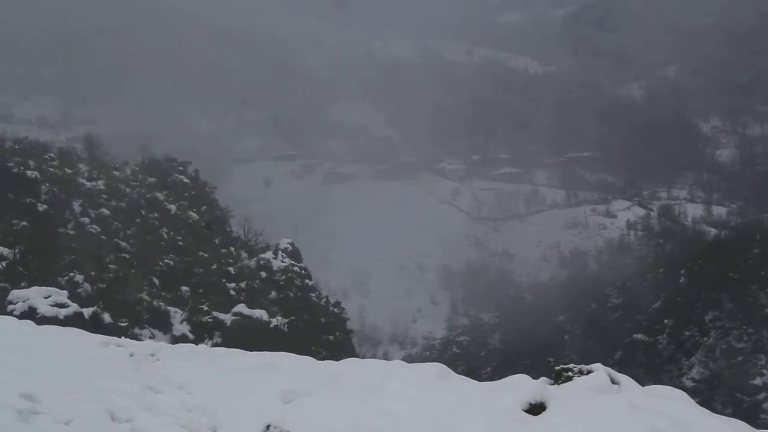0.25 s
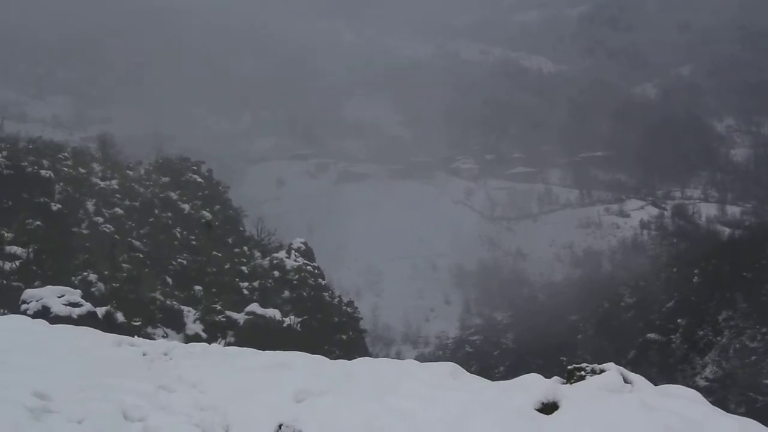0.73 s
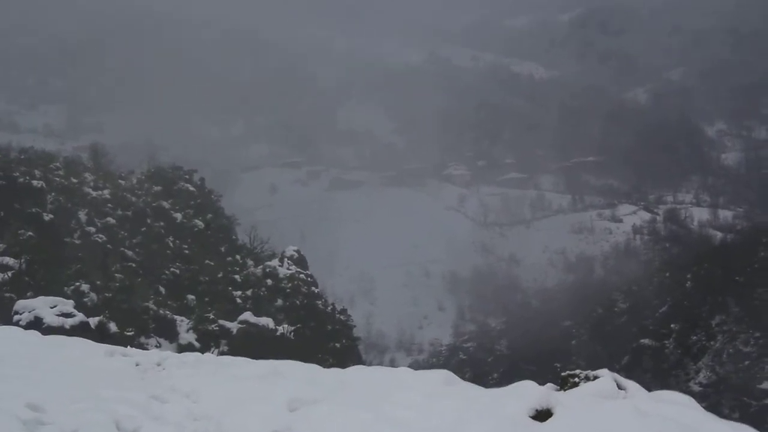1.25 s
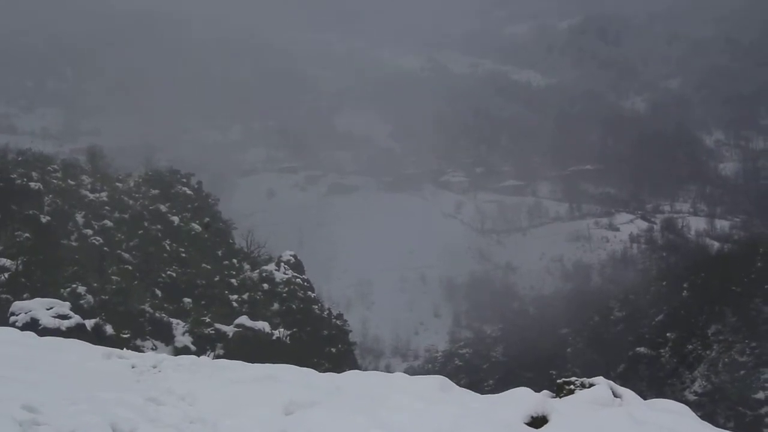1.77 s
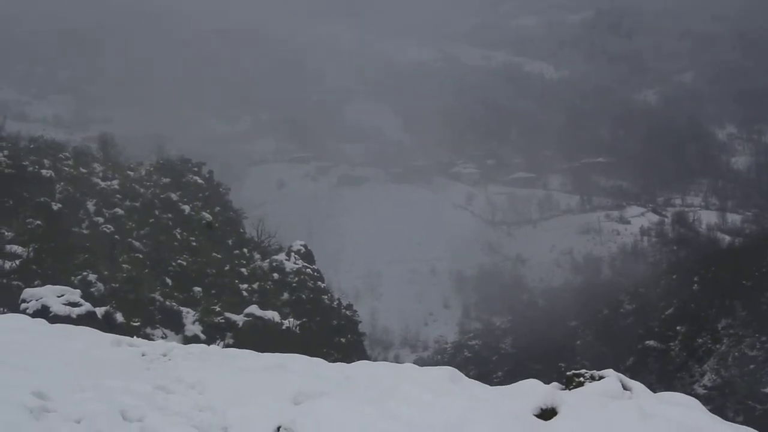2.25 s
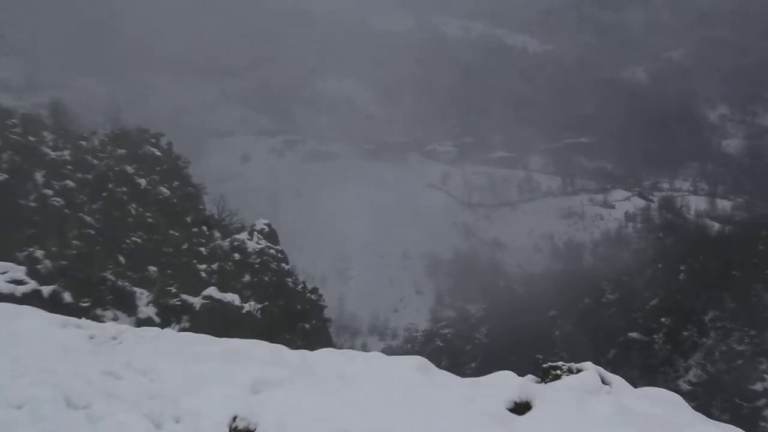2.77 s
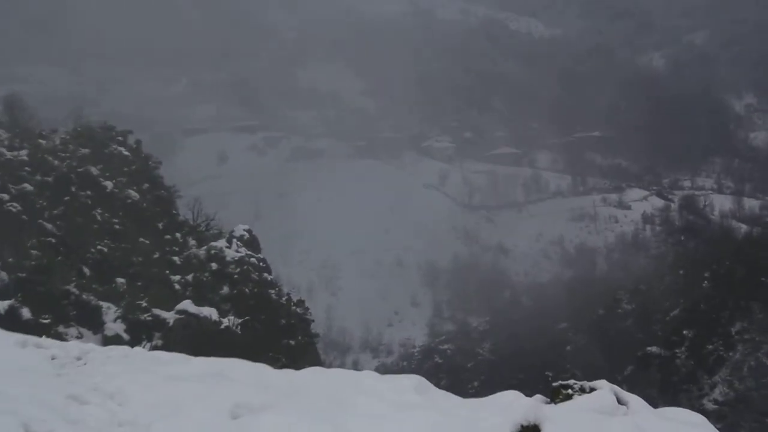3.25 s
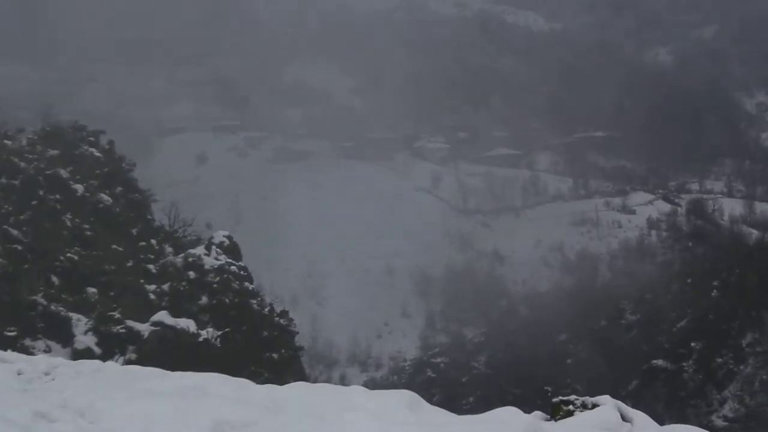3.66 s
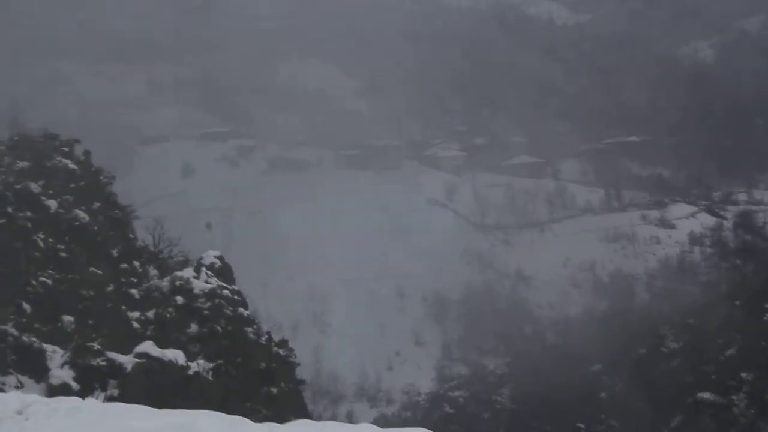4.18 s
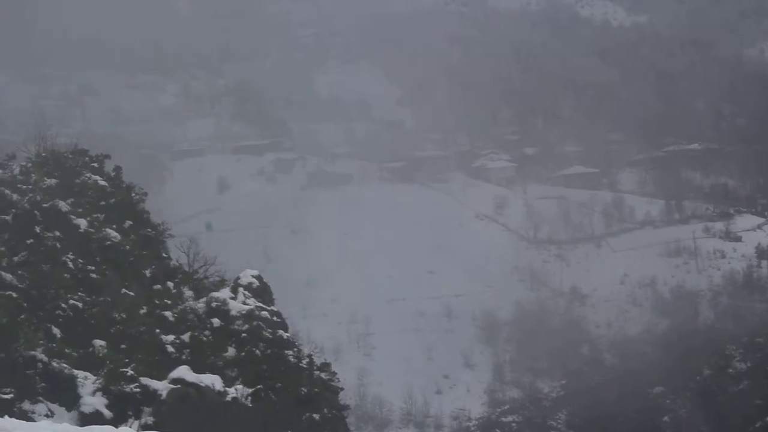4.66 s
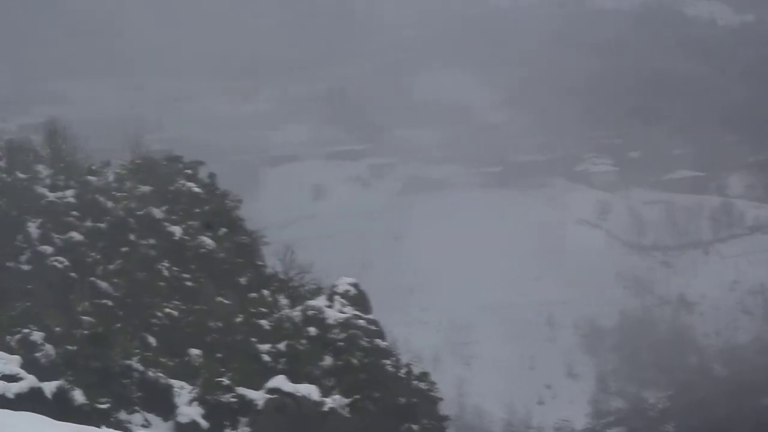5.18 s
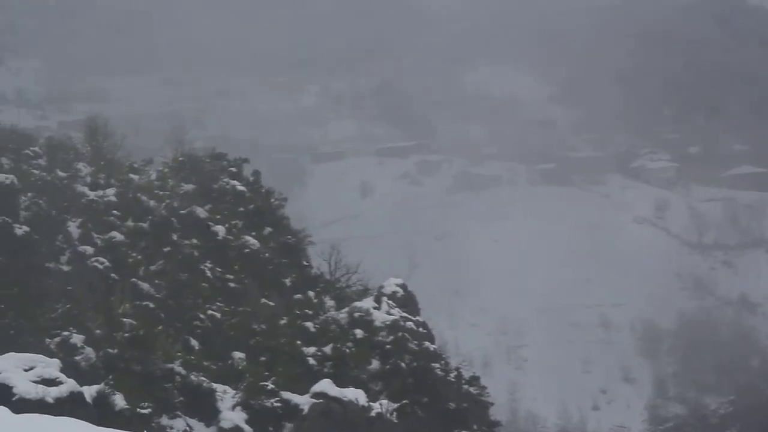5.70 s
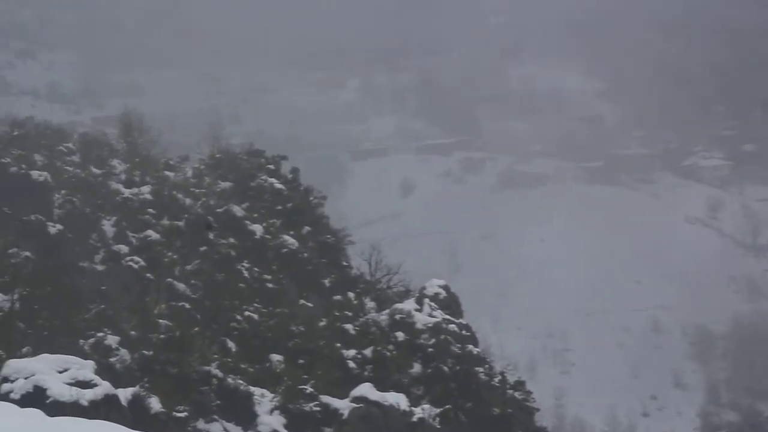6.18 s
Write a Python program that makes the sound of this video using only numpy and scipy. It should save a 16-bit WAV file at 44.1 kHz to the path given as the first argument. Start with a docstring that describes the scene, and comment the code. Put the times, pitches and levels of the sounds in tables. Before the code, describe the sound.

Snowstorm on a mountainside, heard very close at a small camera's microphone. After a brief quiet start, strong gusts rumble and ice pellets crackle and knock the housing in a dense, overloading flurry. The wind eases to scattered ticks, hits thicken near four seconds, then a short lull and irregular taps to the end.

```python
"""A snowstorm on a mountainside, heard by a small camera, over the faint steady roar of the valley (shaped noise).
Strong gusts soon buffet the microphone (lumpy low noise) and drive ice pellets against the housing: grains of noise
crackle and patter in flurries, and hard hits tick, knock and thump by exciting resonances. The wind then eases to
scattered hits; they thicken near four seconds, a thin sine whistle shows in the lull after, and more hits follow
to the end. The loudest blows reach the recorder's ceiling."""
import sys
import numpy as np
from scipy.fft import rfft, irfft, next_fast_len
from scipy.io import wavfile
from scipy.ndimage import map_coordinates

SR = 44100
rng = np.random.default_rng(int(sys.argv[2]) if len(sys.argv) > 2 else 0)


def put_to_file(sound):
    """Save the sound as 16-bit audio at rate SR, in the file named by the first command-line argument."""
    columns = np.atleast_2d(sound).T  # one column per channel
    safe = np.clip(columns, -1, 1)
    whole_steps = np.round(safe * 32767)
    wavfile.write(sys.argv[1], SR, whole_steps.astype(np.int16))


N = 283563
T = np.arange(N) / SR  # time, s


def amp(db):
    """Level to gain: 20 dB is a factor of ten in amplitude."""
    return 10 ** (np.asarray(db) / 20)


def unit(x):
    """Normalisation: the signal at a root mean square of 1."""
    return x / np.sqrt(np.mean(x ** 2) + 1e-20)


def wobble(rate):
    """Slow fluctuation: a smooth curve through random knots, rate of them a second."""
    knots = rng.standard_normal(int(N * rate / SR) + 4)
    return map_coordinates(knots, [T * rate])


def filtered(x, response):
    """Linear filtering: the spectrum times a response of frequency, padded against wrap-around."""
    size = next_fast_len(x.shape[-1] + 8192)
    spectrum = rfft(x, size) * response(np.fft.rfftfreq(size, 1 / SR))
    return irfft(spectrum, size)[..., :x.shape[-1]]


def coloured(x, spectrum):
    """Spectral shaping: x through (hz, db) points on a log frequency axis, at rms 1."""
    f, db = np.transpose(spectrum)

    def response(hz):
        return amp(np.interp(np.log(hz + 1), np.log(f), db, -120, -120))

    return unit(filtered(x, response))


def ring(f, hz, width):
    """Resonance: the response of a damped oscillator, 1 at its pitch hz, width in Hz."""
    return 1j * f * width / (hz ** 2 - f * f + 1j * f * width)


def laid(times, rows):
    """Superposition: each row added in at its time."""
    at = np.round(times * SR).astype(int)[:, None] + np.arange(rows.shape[1])
    return np.bincount(at.ravel(), rows.ravel(), N + SR)[:N]


def peaked(rows, db):
    """Peak normalisation: each row scaled to its peak level."""
    return rows / np.abs(rows).max(axis=1, keepdims=True) * amp(db)


def swollen(base_db, s, length, peak_db):
    """Power addition: bell-shaped swells are added to the power of a level in dB."""
    power = amp(2 * base_db)
    for at, wide, db in zip(s, length, peak_db):
        power = power + amp(2 * db) * np.exp(-(2.2 * (T - at) / wide) ** 2)
    return 10 * np.log10(power)


def damped(db, grows):
    """Level compression: the swing of a level curve about its mean is scaled."""
    return db.mean() + grows * (db - db.mean())


def grains(per_s, spread_db, lasts, hz, size):
    """Poisson process: swelling noise bursts at random times and pitches, many small, few large, power evened."""
    smallest_odds = 0.025  # bounds the largest grain
    draw = rng.random((6000, 3))
    expected = np.cumsum(per_s) / SR
    times = np.interp(np.cumsum(-np.log(draw[:, 0])), expected, T, right=-1)
    live = times >= 0  # the rest would fall after the end
    age = np.arange(size) / SR / lasts  # a burst's envelope is fullest at age 1
    bursts = rng.standard_normal((len(draw), size)) * age ** 2 * np.exp(-2 * age)
    pitch = hz * np.exp(2.44 * (draw[:, 2:] - 0.5))
    response = ring(np.fft.rfftfreq(size, 1 / SR), pitch, 0.7 * pitch) + 0.58
    bursts = irfft(rfft(bursts) * response)
    size_db = -spread_db * np.log(draw[:, 1:2] + smallest_odds)
    return unit(laid(times[live], peaked(bursts, size_db)[live]) / np.sqrt(per_s))


def valley():
    """Distant broadband noise: a shaped roar whose level barely wanders."""
    # Spectrum of the roar: hz, db (per Hz, relative)
    roar_spectrum = [(30, -42), (80, -5), (300, 0), (700, 6), (1500, 12), (3000, -14), (8000, -14),
                     (12000, -24), (16500, -34)]
    level_db = -56 + 0.9 * wobble(4.82)
    return amp(level_db) * coloured(rng.standard_normal(N), roar_spectrum)


def whistle():
    """Pure tone: a very faint sine of steady pitch in the lull, its level wavering."""
    start_s, end_s, fade_s, pitch_hz = 4.74, 5.1, 0.041, 10490
    on = np.clip(np.minimum(T - start_s, end_s - T) / fade_s, 0, 1)
    return on * amp(-73 + 4 * wobble(40)) * np.sin(2 * np.pi * pitch_hz * T)


def rumble(rumble_db):
    """Turbulent pressure: large eddies push on the microphone as deep noise."""
    # Spectrum of the large eddies: hz, db (per Hz, relative)
    rumble_spectrum = [(20, -48), (40, -7), (80, 8), (130, 5), (220, 6.5)]
    return amp(rumble_db + 2.8 * wobble(20)) * coloured(rng.standard_normal(N), rumble_spectrum)


def buffet(buffet_db):
    """Intermittent turbulence: small eddies push on the microphone in lumps."""
    # Spectrum of the small eddies: hz, db (per Hz, relative)
    buffet_spectrum = [(80, -48), (160, -2.5), (300, 0.5), (450, -5.5), (700, -11), (1300, -27.5)]
    lumps = amp(1.5 * wobble(25) + 3.2 * wobble(70))
    return amp(buffet_db) * unit(lumps * coloured(rng.standard_normal(N), buffet_spectrum))


def fine_snow():
    """Dense random impacts: grains too many to tell apart merge into fluctuating noise."""
    return amp(1.5 * wobble(60)) * rng.standard_normal(N)


def patter(per_s, patter_db, centre_hz):
    """Structure-borne sound: pellet taps pass through the housing, its thin parts taking the brighter share."""
    # Spectrum through the housing: hz, db (per Hz, relative)
    body_spectrum = [(300, -22), (500, -6), (750, -5), (1100, -10.5), (1700, -36.5), (3000, -92.5)]
    # Spectrum through its thin parts: hz, db (per Hz, relative)
    thin_spectrum = [(600, -82), (1100, -0.5), (1600, 6.5), (2400, -0.5), (3400, -4), (5000, -17.5),
                     (8000, -55)]
    taps = grains(0.7 * per_s, spread_db=2.0, lasts=0.002, hz=1240, size=600) + 0.61 * fine_snow()
    thin = np.clip(np.log(centre_hz / 680) / 1.5, 0.01, 0.95)  # power share of the thin parts
    body = np.sqrt(1 - thin) * coloured(taps, body_spectrum)
    return amp(patter_db) * (body + np.sqrt(thin) * coloured(taps, thin_spectrum))


def crackle(per_s, crackle_db):
    """Shot noise: brief bright ticks of many small pellets, blurring into hiss where they are dense."""
    # Spectrum of the crackle: hz, db (per Hz, relative)
    crackle_spectrum = [(1500, -5), (2500, 1.5), (4000, 0.5), (6000, 0), (8500, 0.5), (11000, -4.5),
                        (14000, -12.5), (16500, -22)]
    ticks = grains(per_s, spread_db=4.5, lasts=0.00055, hz=6300, size=300)
    return amp(crackle_db) * coloured(ticks + per_s / 900 * fine_snow(), crackle_spectrum)


def flurries(patter_db, centre_hz, crackle_db):
    """Impact density: a stronger flurry brings more pellets a second to both patter and crackle."""
    per_s = 420 * amp(0.25 * (crackle_db + 40) + 1.5 * wobble(30))
    per_s = np.clip(per_s, 30, 900)
    return patter(per_s, patter_db, centre_hz) + crackle(per_s, crackle_db)


def strays(buffet_db, patter_db, crackle_db):
    """Random impacts: rows of lesser hits, as strong as the weather of their moment."""
    count = 260
    tick_over_db, knock_over_db, thump_over_db = 18, 5, 6.5  # peaks over crackle, patter and buffet
    typical_hz = np.array([[6700], [990]])  # tick, knock
    draw = rng.standard_normal((count, 5))
    at = (rng.random(count) * (N - 1)).astype(int)
    scatter_db = 4.5 * np.clip(draw[:, :3], -3, 1.5).T
    tick_hz, knock_hz = typical_hz * np.exp(0.39 * draw[:, 3:].T)
    tick_db = crackle_db[at] + tick_over_db + scatter_db[0]
    knock_db = patter_db[at] + knock_over_db + scatter_db[1]
    thump_db = buffet_db[at] + thump_over_db + scatter_db[2]
    return np.transpose([T[at], tick_db, tick_hz, knock_db, knock_hz, thump_db])


def hits(rows):
    """Modal excitation: a hard pellet shatters with a coloured tick and shakes the modes of the housing."""
    # Modes of the housing before scatter: mode_hz, mode_db (relative), t60_s (time to fall 60 dB)
    housing_modes = [(170.5, -9, 0.059), (275, -11.5, 0.013), (403, -5.5, 0.013), (642, 3.5, 0.012),
                     (880, -1.5, 0.013), (1270, -5, 0.017), (1830, -1.5, 0.012), (2850, -1.5, 0.0034)]
    start_s, tick_db, tick_hz, knock_db, knock_hz, thump_db = np.transpose(rows)[..., None]
    count = len(start_s)
    t = np.arange(2048) / SR
    f = np.fft.rfftfreq(len(t), 1 / SR)

    def low(hz):
        return (hz / (hz + 1j * f)) ** 2

    noise = rng.standard_normal((count, 2, len(t)))
    lasting = np.exp(0.35 * rng.standard_normal((count, 1)))  # contact time varies from hit to hit

    age = t / (0.00051 * lasting)
    shatter = noise[:, 0] * (age ** 2 * np.exp(-2 * age) + 0.006 * amp(-60 * t / 0.019))  # burst and faint tail
    high = (1j * f / (1j * f + 2200)) ** 2  # the tick carries little bass
    tick = irfft(rfft(shatter) * ring(f, tick_hz, tick_hz) * high * low(16500))

    mode_hz, mode_db, t60_s = np.transpose(housing_modes)[:, None, :, None]
    draw = rng.standard_normal((count, len(housing_modes), 2))
    scattered_hz = mode_hz * np.exp(0.12 * draw[..., 1:])
    width_hz = np.log(1000) / np.pi / t60_s
    modes = amp(mode_db + 3.5 * draw[..., :1]) * ring(f, scattered_hz, width_hz)
    near = amp(-7 * np.log(mode_hz / knock_hz[:, None]) ** 2)  # modes far from the knock pitch are hardly stirred

    shove = rfft(noise[:, 1] * amp(-60 * t / (0.016 * lasting)))  # the crumbling contact lasts milliseconds
    knock = irfft(shove * (near * modes)[:, 3:].sum(axis=1) * low(1950))
    thump = irfft(shove * modes[:, :3].sum(axis=1) * low(580))  # the three lowest modes
    blows = peaked(tick, tick_db) + peaked(knock, knock_db) + peaked(thump, thump_db)
    return laid(start_s[:, 0], blows)


def scene():
    """Superposition: valley, wind, whistle, flurries and hits sum at one microphone."""
    # Weather between the swells: time_s, buffet_db, patter_db, patter_centre_hz, crackle_db
    gust_curve = [(0.0, -45, -45, 910, -57), (0.29, -44, -44.5, 920, -58), (0.36, -33.5, -31.5, 810, -42),
                  (0.52, -24.5, -27.5, 930, -33), (0.66, -15, -20, 860, -30), (0.75, -24.5, -29, 1000, -31),
                  (1.02, -24, -27, 840, -34), (1.14, -22, -23, 900, -31), (1.34, -30.5, -18.5, 1398, -30),
                  (1.42, -36.5, -40.5, 850, -47), (1.57, -31, -25, 865, -42), (1.65, -44.5, -55, 830, -59),
                  (1.8, -50.5, -56, 752, -69), (1.91, -52, -56, 797, -64), (1.96, -30, -39, 749, -42),
                  (2.12, -35, -43, 906, -39), (2.36, -41.5, -54, 1299, -42), (2.81, -38.5, -40, 941, -44),
                  (2.95, -39, -39, 850, -46), (3.02, -40, -44, 878, -55), (3.159, -38.5, -42, 899, -55),
                  (3.46, -33.5, -38, 780, -47), (3.64, -37, -42, 799.7, -50), (3.8, -25.5, -34, 716, -43),
                  (4.1, -29.5, -35.5, 841, -45), (4.27, -38.5, -42, 886, -53),
                  (4.45, -32.5, -39.5, 895.5, -45), (4.64, -41, -42.5, 893, -55),
                  (4.8, -46, -44, 896.4, -60), (5.05, -43, -39.5, 899, -59), (5.2, -31, -39, 870, -48),
                  (5.42, -36, -38, 851, -52), (5.58, -43.5, -42.5, 865, -60), (5.78, -34, -37, 900, -49),
                  (6.02, -43.5, -47, 952, -59), (6.279, -39.5, -42, 900, -55),
                  (6.43, -34.5, -38.5, 1049, -46)]
    # Short puffs of wind on the microphone: centre_s, length_s, peak_db
    puff_swells = [(0.223, 0.073, -27), (0.339, 0.027, -22.5), (0.441, 0.084, -17.5), (0.613, 0.047, -11.0),
                   (0.792, 0.042, -17.0), (0.947, 0.025, -21), (1.147, 0.036, -18.5), (1.549, 0.079, -21),
                   (2.187, 0.05, -29.5), (2.505, 0.04, -33.5), (2.582, 0.033, -33.5), (2.767, 0.054, -28.5),
                   (2.905, 0.061, -27), (3.248, 0.043, -27), (3.31, 0.021, -25.5), (3.377, 0.03, -27.5),
                   (3.537, 0.13, -26.5), (4.578, 0.049, -33), (5.115, 0.034, -26.0), (5.406, 0.065, -26.5),
                   (5.652, 0.043, -24.5), (5.766, 0.049, -26.5), (5.955, 0.038, -36), (6.112, 0.036, -31.5),
                   (6.218, 0.028, -31)]
    # Handfuls of pellets: centre_s, length_s, crackle_peak_db, patter_peak_db
    pellet_swells = [(0.208, 0.061, -45, -36), (0.676, 0.069, -25, -28), (0.771, 0.044, -22, -22.5),
                     (0.879, 0.045, -21, -17), (1.132, 0.024, -23, -15.5), (1.315, 0.087, -23, -28),
                     (1.548, 0.04, -22, -18.5), (1.703, 0.025, -51, -43), (1.851, 0.021, -58, -50),
                     (2.052, 0.052, -32, -30.5), (2.231, 0.119, -34, -45), (2.35, 0.06, -38, -48),
                     (2.495, 0.028, -37, -41), (2.583, 0.033, -43, -53), (2.675, 0.056, -41, -66),
                     (2.802, 0.029, -43, -46), (2.957, 0.025, -43, -49), (3.115, 0.023, -50, -42),
                     (3.24, 0.044, -42, -36), (3.551, 0.14, -42, -36), (3.795, 0.064, -39, -29.5),
                     (3.898, 0.062, -37, -33.5), (4.026, 0.099, -37, -36), (4.222, 0.025, -44, -32),
                     (4.348, 0.032, -42, -48), (4.494, 0.067, -41, -32.5), (4.704, 0.022, -49, -45),
                     (5.241, 0.15, -46.5, -45), (5.397, 0.056, -47, -34), (5.753, 0.028, -40, -26.5),
                     (5.814, 0.024, -40, -31), (5.927, 0.023, -49, -32), (6.078, 0.026, -48.5, -34.5),
                     (6.161, 0.023, -53, -40), (6.211, 0.026, -52.5, -33), (6.334, 0.031, -48, -41)]
    # Rumble against the buffet: time_s, level_db
    rumble_curve = [(0, -2), (1.2, -9), (2.5, -5), (3.9, -5), (4.03, 4), (4.2, -4), (5.0, -10.5),
                    (6.43, -8.5)]
    # Single hard hits, peak levels: start_s, tick_db, tick_hz, knock_db, knock_hz, thump_db
    hard_hits = [(0.0921, -31, 4700, -29, 970, -31), (0.1883, -34, 6900, -34, 850, -26),
                 (0.2163, -23.5, 4400, -26, 960, -19), (0.3218, -25, 7300, -34, 1150, -21),
                 (0.4801, -14.5, 4950, -6, 780, -18), (0.5845, -14, 5700, -2.5, 770, -5.5),
                 (0.7608, -11, 5386, -4.5, 1642, -20), (0.7702, -12, 6155, -4.5, 1150, -15),
                 (0.8327, -17, 4770, -11, 960, -27), (0.8735, -4, 5640, -3, 1010, -11),
                 (0.8838, -6, 4200, -5, 940, -16), (0.9006, -11, 5400, -7, 1190, -14),
                 (0.938, -11, 4917, -4.5, 1197, -12), (1.02, -29, 6623, -6.5, 1020, -35),
                 (1.0799, -22, 5424, -1.5, 998, -25), (1.12, -8, 4650, -0.5, 922, -5.5),
                 (1.1642, -8, 6700, -2.5, 955, -23), (1.19, -11.5, 4477, -7, 1151, -5),
                 (1.251, -8, 6013, -2.5, 1497, -11), (1.2669, -14, 3514, -0.5, 1480, -12),
                 (1.3211, -11, 3930, -4, 1431, -25), (1.3499, -13, 5770, -5, 1290, -20),
                 (1.3726, -15, 3600, -9, 860, -22), (1.4186, -32, 6004, -13, 930, -29),
                 (1.4631, -21, 4200, -11.5, 1125, -39), (1.4817, -16, 4504, -13, 780, -26),
                 (1.5329, -21, 4190, -9, 1120, -17), (1.5479, -20, 4370, -8.5, 989, -16),
                 (1.5577, -14.5, 4600, -8, 741, -6), (1.6389, -23, 5410, -20, 936, -23),
                 (1.6997, -25, 6810, -46, 1020, -37), (1.7109, -28, 6650, -19, 848, -21),
                 (1.8372, -16.5, 5060, -16, 751, -21.5), (1.8508, -24, 4800, -22.5, 1042, -39),
                 (1.8983, -10, 6040, -19, 956, -25), (1.9473, -13.5, 5310, -7, 740, -9),
                 (2.0438, -6.5, 4160, -17.5, 930, -30), (2.0612, -20, 6300, -23, 749, -8.5),
                 (2.3212, -18.5, 7210, -42, 1300, -46), (2.4912, -15.5, 7020, -24.5, 787, -33),
                 (2.6784, -11.5, 8180, -33, 970, -36), (2.6929, -19, 8290, -32, 970, -34),
                 (2.7588, -4.5, 5400, -17.5, 988, -18.5), (2.8075, -18, 7190, -37, 725, -27),
                 (2.8288, -13.5, 5800, -19.5, 1223, -28), (2.9475, -19, 5470, -33, 1090, -28),
                 (2.9655, -17.5, 7180, -39, 850, -32), (3.1732, -22, 4937, -34, 901, -38),
                 (3.2388, -21, 4800, -17, 1269, -19), (3.2973, -24, 5194, -22, 926.6, -29),
                 (3.5341, -17, 7600, -32, 670, -19), (3.6737, -15, 6404, -23, 1123, -28),
                 (3.7036, -17, 6586, -17.5, 732, -36), (3.8025, -13, 5875, -14, 824, -19),
                 (3.8627, -15, 4800, -10, 680, -10), (3.9169, -36, 3930, -11.5, 704, -21),
                 (3.9328, -15, 6310, -27, 670, -14.5), (3.9865, -19, 3904, -5.5, 748, -25),
                 (4.0243, -5.5, 8510, -3.5, 908, -2.5), (4.0554, -6.5, 7310, -8.5, 1063, -19),
                 (4.083, -16.5, 5420, -12.5, 1080, -25), (4.122, -17, 4860, -2, 980, -7.5),
                 (4.2128, -8, 5130, -2, 855, -10), (4.2253, -30, 4497, -7, 882, -10),
                 (4.2372, -24, 9840, -25, 891, -21), (4.3249, -17.5, 6630, -11, 911, -15),
                 (4.3433, -25, 4290, -12.5, 1022, -21), (4.3519, -14, 5320, -26, 1020, -28),
                 (4.3903, -18.5, 6890, -16, 905, -30), (4.4142, -22, 4316, -20, 1079, -34),
                 (4.4331, -23, 4800, -11, 884, -25), (4.4878, -10, 3860, 3.5, 760, -4.5),
                 (4.5036, -15, 7180, -24, 860, -11), (4.5197, -21, 4470, -13.5, 1424, -20),
                 (4.5667, -4.5, 6830, -8, 980, -27), (4.5885, -14.5, 8420, -15.5, 875, -32),
                 (4.6738, -9.5, 5500, -6.5, 939, -25), (4.6979, -23, 6550, -22.5, 870, -35),
                 (4.7088, -25, 7150, -31, 1130, -43), (4.7551, -16.5, 8560, -20.5, 1009, -31),
                 (4.7956, -24.5, 6140, -18, 930, -33), (4.9154, -27, 4790, -28, 1088, -47),
                 (5.0127, -18.5, 7450, -18, 1005, -23.5), (5.0471, -8.5, 6500, -31, 1470, -40),
                 (5.1181, -29, 4706, -15, 712, -16), (5.1266, -21.5, 6690, -27.5, 880, -28),
                 (5.1407, -18.5, 6550, -16, 950, -27), (5.1995, -17, 3620, -8, 907, -15),
                 (5.2288, -17, 5180, -11.5, 989, -24), (5.2508, -3, 6890, -8, 1030, -10),
                 (5.2812, -20.5, 3620, -22, 1400, -34.5), (5.3005, -6, 5646, -21, 1057, -36),
                 (5.3218, -18, 6286, -10, 805, -17), (5.3609, -22, 3007, -7, 937, -10),
                 (5.3951, -25, 3950, -9.5, 812, -21), (5.4166, -27, 4120, -25, 724, -36),
                 (5.4506, -21, 5820, -36, 800, -34), (5.4825, -17, 6584, -30, 972, -32),
                 (5.6358, -12, 7230, -35, 783, -18), (5.6429, -19, 8550, -10.5, 873, -11.5),
                 (5.6665, -20, 8400, -33, 777.4, -36), (5.7502, -14.5, 6500, -9, 1087, -12),
                 (5.7608, -23, 3020, -15, 899, -20), (5.7858, -17, 2990, -16, 1204, -28),
                 (5.807, -21, 5890, -17, 999, -16), (5.8157, -7, 5480, -14, 903, -23),
                 (5.8216, -17, 8120, -19, 830, -13), (5.8807, -27.5, 7400, -43, 950, -44),
                 (5.9334, -18.5, 8200, -15, 1000, -35), (6.0002, -3, 5404, -7, 1166, -23),
                 (6.0685, -44, 3205, -15, 944, -18), (6.119, -32, 3793, -21, 1140, -26),
                 (6.1475, -29, 3820, -34, 841, -35), (6.1665, -24.5, 4705, -35, 800, -32.5),
                 (6.2021, -17.5, 5683, -18.5, 873, -18), (6.2419, -30, 3912, -24, 979, -37),
                 (6.2592, -25, 7780, -38, 874, -34), (6.3011, -46, 4100, -20.5, 884, -40),
                 (6.3305, -18.5, 6720, -33, 867, -31), (6.3452, -15, 7530, -16.5, 758, -15),
                 (6.3854, -23, 6370, -15.5, 1002, -34), (6.3989, -19, 6100, -24, 984, -30)]

    s, *columns = np.transpose(gust_curve)
    calm_buffet_db, calm_patter_db, centre_hz, calm_crackle_db = [np.interp(T, s, c) for c in columns]
    buffet_db = swollen(calm_buffet_db, *np.transpose(puff_swells))
    s, length, crackle_peak_db, patter_peak_db = np.transpose(pellet_swells)
    patter_db = swollen(calm_patter_db, s, length, patter_peak_db)
    crackle_db = swollen(calm_crackle_db, s, length, crackle_peak_db)

    # the rumble follows the buffet at 0.8 dB per dB and wanders
    rumble_db = damped(buffet_db, 0.8) + np.interp(T, *np.transpose(rumble_curve)) + 3.5 * wobble(8)
    wind = rumble(rumble_db) + buffet(buffet_db)
    # a thick flurry drowns its single ticks: they grow 0.65 dB per dB of crackle
    lesser_hits = strays(buffet_db, patter_db, damped(calm_crackle_db, 0.65))
    pellets = flurries(patter_db, centre_hz, crackle_db) + hits(lesser_hits) + hits(hard_hits)
    return (valley() + whistle() + wind + pellets)[None]


def record(dry):
    """Saturation and band limiting: the recorder bends peaks under its ceiling, then cuts the top."""
    ceiling, top_hz = 0.98, 16300
    clipped = dry / (1 + np.abs(dry / ceiling) ** 8) ** (1 / 8)
    return filtered(clipped, lambda hz: np.clip((top_hz + 400 - hz) / 800, 0, 1) ** 2)


dry = scene()
out = record(dry)
put_to_file(out)
```